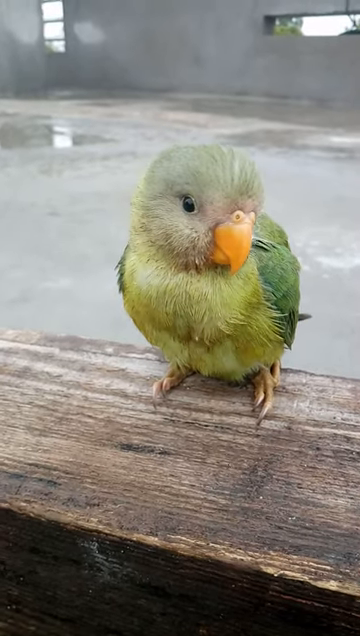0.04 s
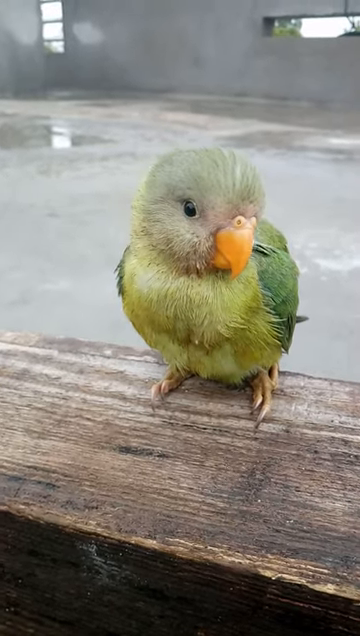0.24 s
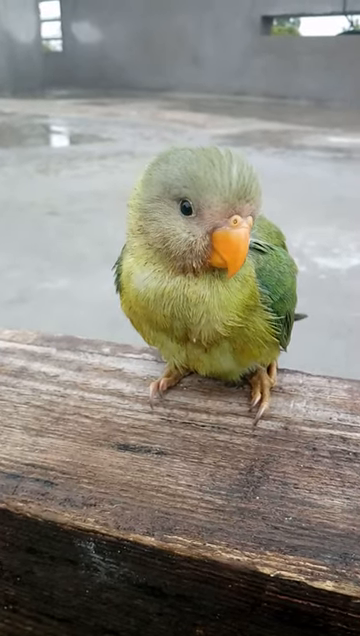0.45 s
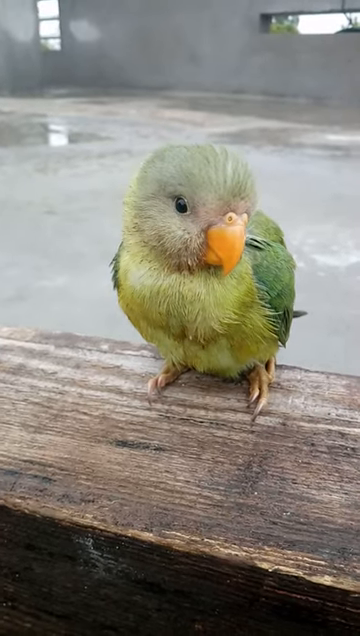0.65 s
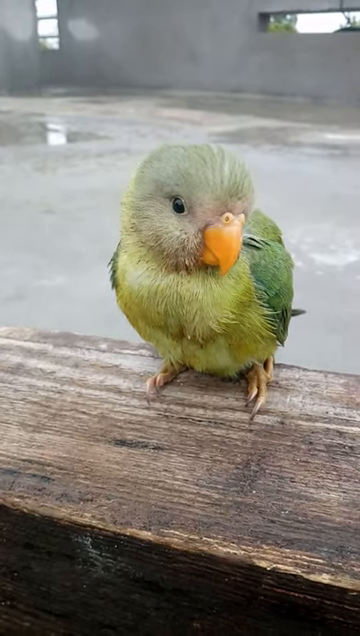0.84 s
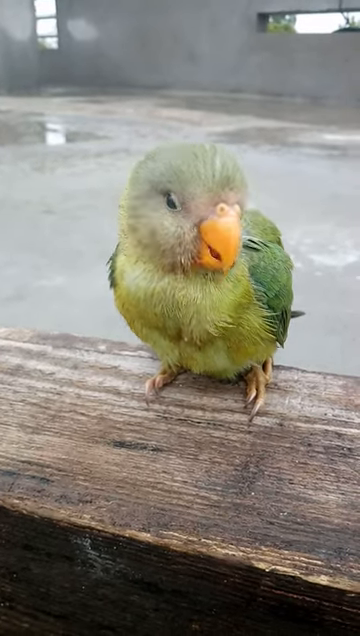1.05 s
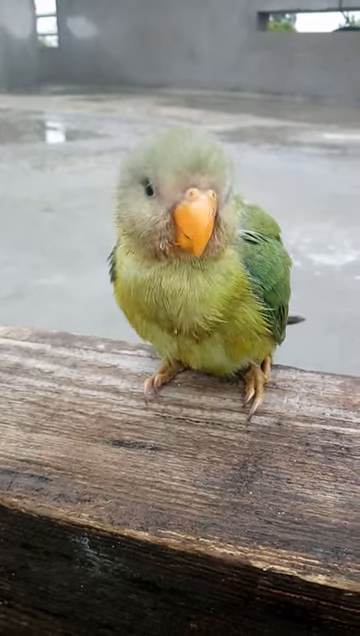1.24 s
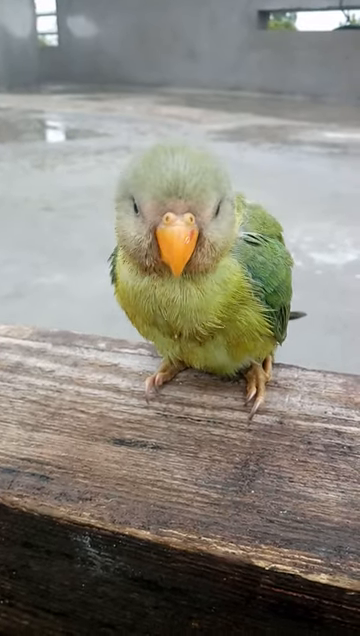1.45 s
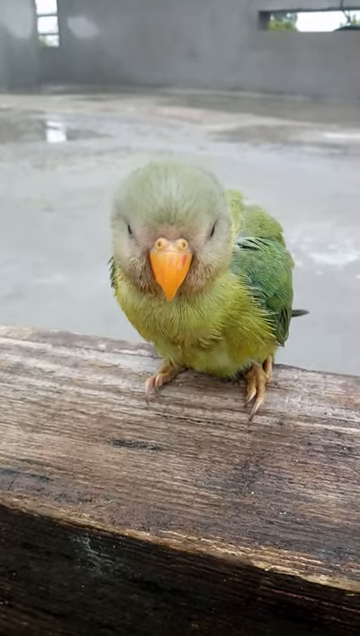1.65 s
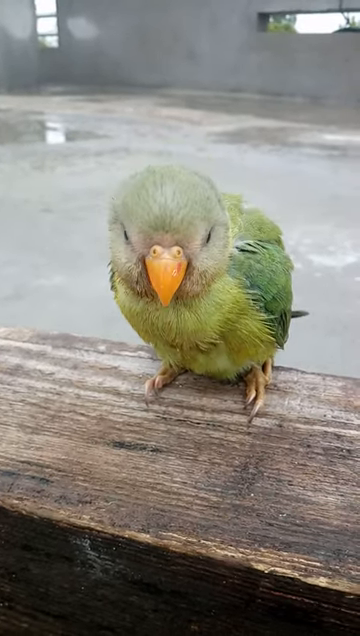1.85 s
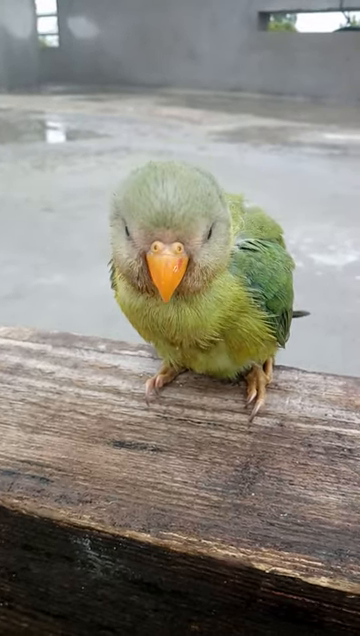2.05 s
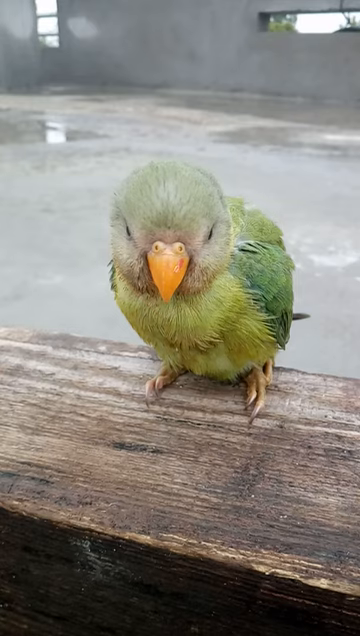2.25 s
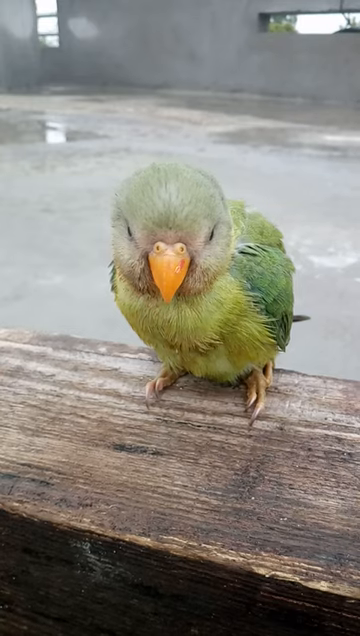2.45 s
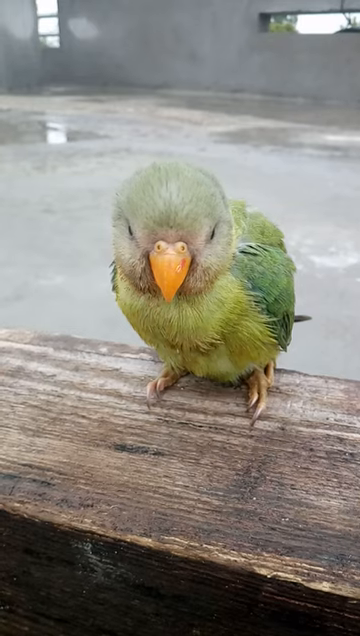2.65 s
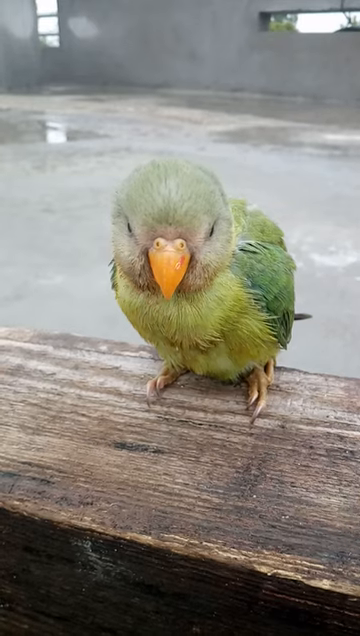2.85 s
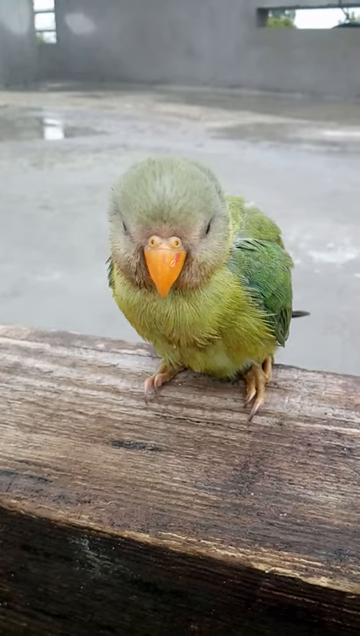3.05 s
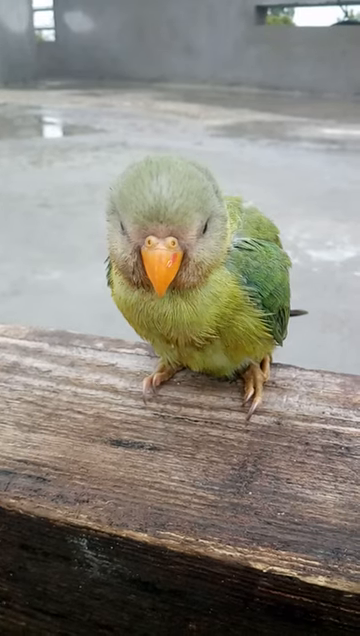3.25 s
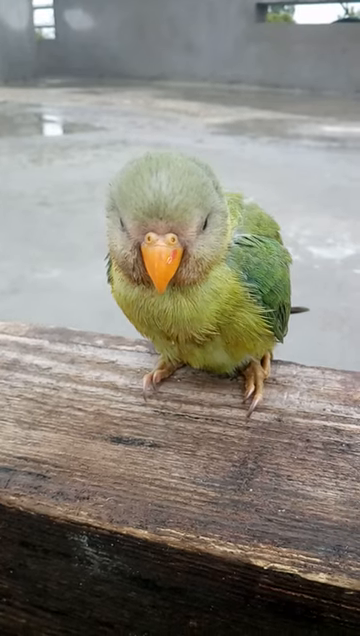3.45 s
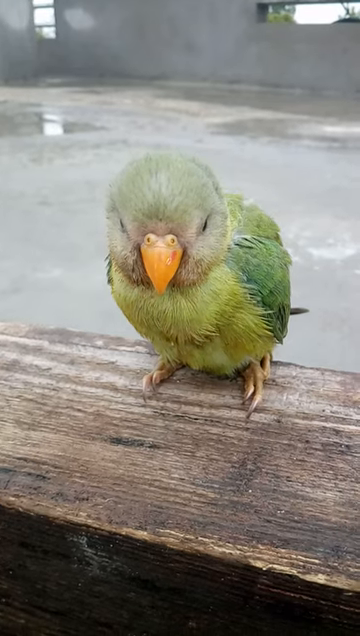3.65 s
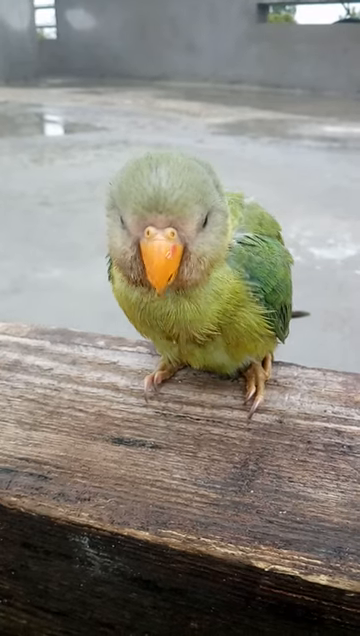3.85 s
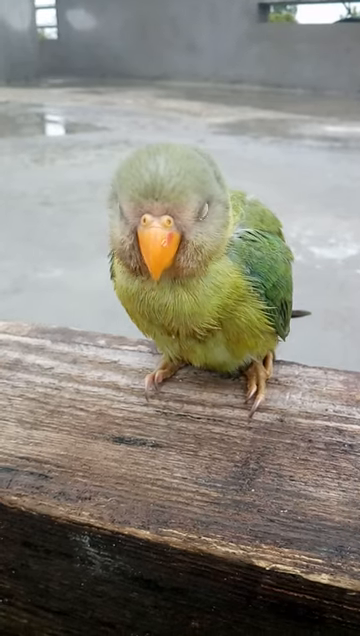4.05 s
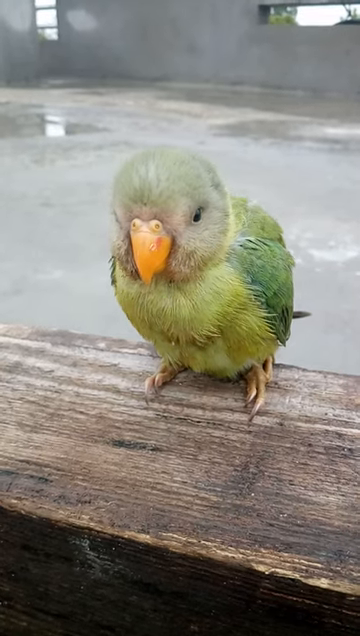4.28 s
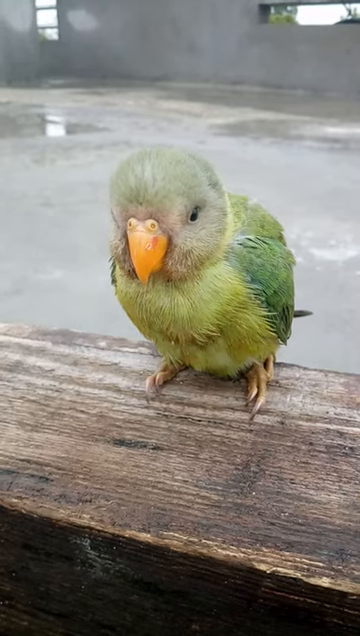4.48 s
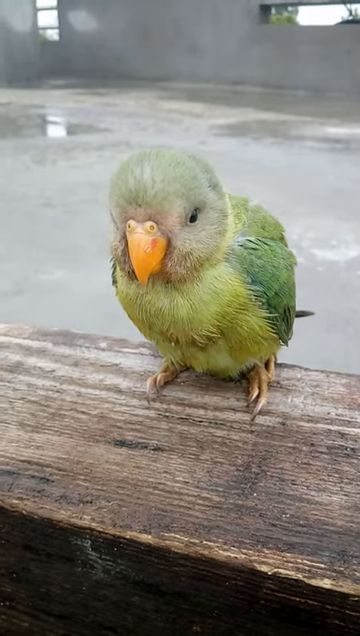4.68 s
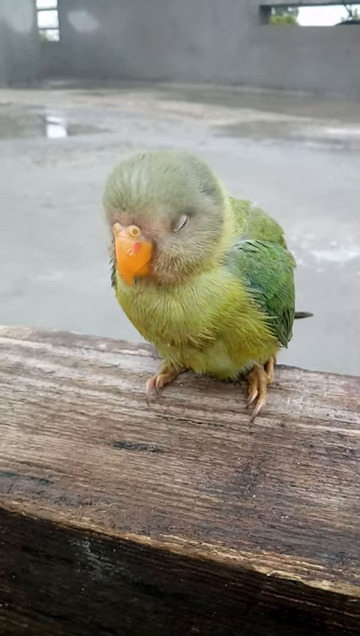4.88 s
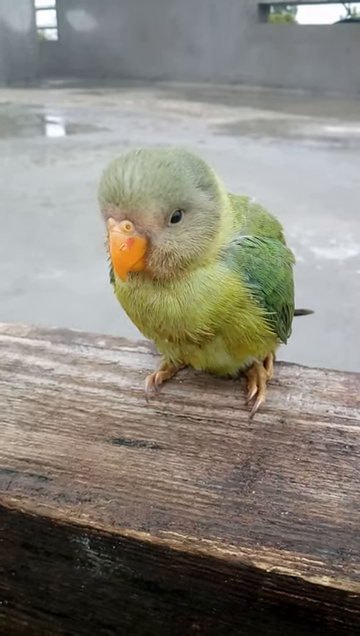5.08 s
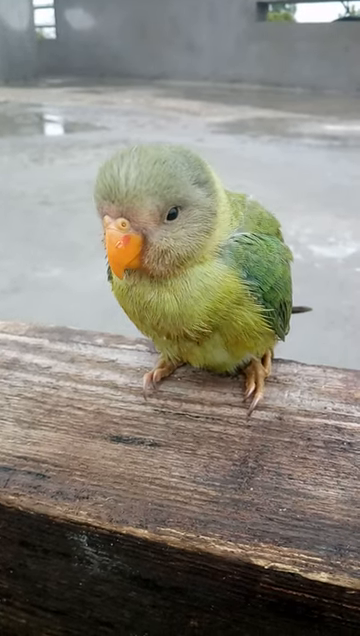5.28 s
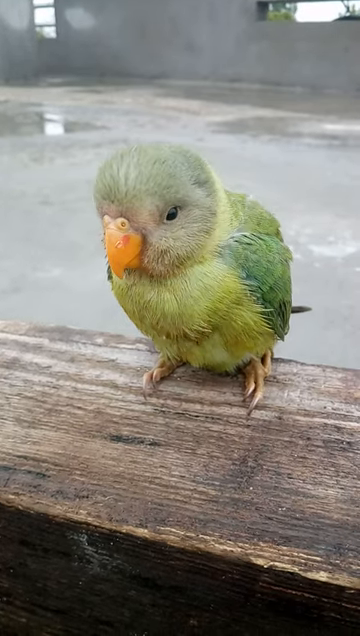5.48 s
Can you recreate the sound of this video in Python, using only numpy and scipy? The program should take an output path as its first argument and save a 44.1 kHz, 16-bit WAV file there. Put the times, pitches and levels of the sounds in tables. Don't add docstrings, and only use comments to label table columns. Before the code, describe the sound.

Close, bright parrot calls in stereo over airy hiss and low town hum. Early soft wind and finger thumps, a far crow and hen clucks; a loud rising squeak just after one second; a quieter gap with small echoing chirps and doves; then a rapid, even chatter of seven raspy falling notes with a second squeak among them, ending in distant tweets.

```python
import sys
import numpy as np
from scipy import signal
from scipy.fft import rfft, irfft
from scipy.io import wavfile
from scipy.ndimage import uniform_filter1d, minimum_filter1d

SR = 44100
rng = np.random.default_rng(int(sys.argv[2]) if len(sys.argv) > 2 else 0)


def int16_out(signal):
    q = np.round(np.clip(np.atleast_2d(signal).T, -1, 1) * 32767)
    wavfile.write(sys.argv[1], SR, q.astype(np.int16))


def field_ratio(decibels):
    return 10 ** (np.asarray(decibels, dtype=float) / 20)


N = 243431


def evened(x):
    return x / np.sqrt(np.mean(x ** 2) + 1e-20)


def read(points, hz, column=1):
    points = np.array(points, float)
    return np.interp(np.log(hz + 1), np.log(points[:, 0] + 1), points[:, column])


def add(mix, s, sound):
    part = mix[..., max(round(s * SR), 0):][..., :sound.shape[-1]]
    part += sound[..., :part.shape[-1]]


def wobble(count, span):
    smooth = uniform_filter1d(rng.standard_normal(count), int(span))
    return evened(uniform_filter1d(smooth, int(span)))


def hum():
    # frequency in Hz, level in dB per Hz.
    hum_colour = [(15, -43), (25, -11.5), (140, -0.5), (306, -4.5), (470, -9), (568, -6.5), (649, -10.5),
                  (1860, -19.5), (2360, -11), (3350, -9), (7130, -27), (8160, -32.5), (11300, -36),
                  (14400, -37), (15600, -48.5)]
    # frequency in Hz, correlation from -1 to 1.
    likeness = [(60, 0.99), (150, 0.99), (380, 0.51), (950, 0.5), (2380, -0.3), (5980, -0.05),
                (15000, 0.66)]
    # frequency in Hz, left minus right in dB.
    balance = [(60, 1.5), (150, -0.5), (380, 0), (950, -1.5), (2380, 8), (5980, 6), (15000, 1.5)]
    # start in seconds, bass in dB, treble in dB,
    # sinking time in seconds.
    surges = [
        (0, 6.5, 6.5, 0.21),
        (.41, -1, 5.5, 1.2),
        (1.0, 3.5, -2, 0.32),
        (1.77, 0, 6.5, 1.6),
        (3.101, 8.5, -1, 0.79),
        (5.29, 1.5, 7.5, .4),
    ]
    calm_bass_db, calm_treble_db = -5, -8
    frames, hz = N // 256 + 5, np.fft.rfftfreq(1024, 1 / SR)
    a, b, c, d, patches = rng.standard_normal((frames, 513, 5)).T
    patches = evened(uniform_filter1d(uniform_filter1d(patches, 8, 0), 12, 1))
    t = np.arange(frames) * 256 / SR
    high = 1 / (1 + (900 / (hz[:, None] + 1)) ** 2)
    low = 1 - high
    swell_db = low * calm_bass_db + high * calm_treble_db
    for s, bass_db, treble_db, sink_s in surges:
        sinking = (t >= s) * np.exp(-abs(t - s) / sink_s)
        swell_db = swell_db + (low * bass_db + high * treble_db) * sinking
    same = np.clip(read(likeness, hz), -1, 1)[:, None]
    left = a + 1j * b
    right = same * left + np.sqrt(1 - same ** 2) * (c + 1j * d)
    z = np.array([left, right])
    z *= field_ratio(np.array([.5, -.5])[:, None, None] * read(balance, hz)[:, None])
    z *= field_ratio(read(hum_colour, hz)[:, None] + 2.2 * patches + swell_db)
    noise = signal.istft(z, nperseg=1024, noverlap=768)[1][:, :N]
    low_cut = signal.butter(3, 42., "high", fs=SR, output="sos")
    return field_ratio(-66.5 + 2.0) * evened(signal.sosfilt(low_cut, noise))


def knocks():
    # centre in seconds, peak in dB, pitch in Hz, left minus right in dB.
    thumps = [(0.045, -45.5, 80.4, -4), (0.058, -46, 188, 10), (.118, -47.5, 115, 27.5), (.163, -46, 70, 5),
              (0.181, -43.5, 61, -5), (0.244, -48, 82.4, 14.5), (0.271, -48, 107, 30),
              (0.27, -59.5, 292, 18), (0.309, -49.5, 202, 8), (1.54, -62, 78.8, -18),
              (1.612, -57, 140, -15), (1.751, -58.5, 129, -23), (1.77, -60, 54.8, -19),
              (1.81, -63, 109.6, -19)]
    # start in seconds, peak in dB, pitch in Hz.
    ticks = [
        (.378, -66, 780),
        (.811, -56, 1400),
        (.845, -55, 1150),
        (.921, -62, 900),
        (.944, -62, 900),
        (1.166, -59, 890),
        (1.167, -58, 3980),
        (5.303, -63, 3265),
    ]
    out, t = np.zeros((2, N)), np.arange(-2000, 2000) / SR
    for s, db, hz, pan_db in thumps:
        phase = np.array([[0], [rng.uniform(-np.pi, np.pi)]])
        push = np.sin(2 * np.pi * hz * t + phase) * np.exp(-(t * hz / 0.93) ** 2)
        add(out, s + t[0], field_ratio(db) * field_ratio(np.array([[pan_db], [-pan_db]]) / 2) * push)
    t = t - t[0]
    for s, db, hz in ticks:
        ring = np.sin(2 * np.pi * hz * t) * t / 0.0006 * np.exp(1 - t / 0.0013)
        add(out, s, field_ratio(db) * ring * field_ratio(np.array([[2], [-2]])))
    return out


def whistle(hz, fuzz_hz):
    span = SR / fuzz_hz / 2
    drift = 0.74 + wobble(len(hz), span) + 1j * wobble(len(hz), span)
    return evened((drift * np.exp(2j * np.pi * np.cumsum(hz) / SR)).real)


def blurred(calls):
    out = np.zeros(N)
    for s, length, from_hz, to_hz, db, fuzz_hz in calls:
        hz = np.geomspace(from_hz, to_hz, round(length * SR))
        add(out, s, field_ratio(db) * whistle(hz, fuzz_hz) * signal.windows.tukey(len(hz), .4))
    return out


def walls(x, first_s, longer):
    # frequency in Hz, decay by 60 dB in seconds, level in dB.
    decay = [(600, 0.25, -9.5), (1157, 0.41, 4.5), (1800, 0.46, 2), (2900, 0.29, 2), (4192, 0.35, -4.5),
             (7260, 0.52, -12), (10000, 0.14, -5)]
    taps = np.zeros((2, SR))
    start = np.arange(int(first_s * SR), SR - 20, 20)
    at = start + rng.integers(0, 20, (2, SR))[:, :len(start)]
    signs = rng.choice([-1., 1.], (2, SR))[:, :len(start)]
    np.put_along_axis(taps, at, signs, 1)
    hz, t, z = signal.stft(taps, SR, nperseg=256)
    fade_db = read(decay, hz, column=2)[:, None] - 60 * t / (longer * read(decay, hz)[:, None])
    tail = signal.istft(z * field_ratio(fade_db), SR, nperseg=256)[1]
    return signal.fftconvolve(x[None], tail / np.linalg.norm(tail[0]), axes=1)[:, :N]


def rooster(out):
    # start in seconds, length in seconds, first, second and third harmonic in dB.
    syllables = [
        (0, 0.061, -80, -65, -60),
        (0.066, 0.17, -68.5, -72, -80),
        (0.206, 0.11, -48, -74.5, -85),
        (0.306, 0.12, -63.5, -85, -89),
        (0.391, 0.16, -66.5, -61.5, -66.5),
        (0.531, 0.13, -61.5, -70, -86),
        (0.727, 0.29, -72, -59, -63.5),
        (0.993, 0.11, -84.5, -59.5, -84),
    ]
    crow_hz, throb_hz, throb_depth = 719, 46, .35
    waver = wobble(SR + SR // 4, 1100)
    crow = np.array([whistle(k * crow_hz * (1 + .007 * waver), 13 * k) for k in range(1, 4)])
    crow *= 1 + throb_depth * np.cos(2 * np.pi * np.cumsum(throb_hz * (1 + 0.7 * waver)) / SR)
    for s, length, *levels_db in syllables:
        u = np.linspace(0, 1, round(length * SR))
        shape = field_ratio(-7 * u ** 2) * signal.windows.tukey(len(u), .5)
        sung = crow[:, round(max(s, 0) * SR):][:, :len(u)]
        add(out, s, shape * (field_ratio(np.array(levels_db)) @ sung))


def far_birds():
    # start and length in seconds, pitch in Hz, level in dB.
    coos = [(0, 0.14, 1254, -69.5), (.41, 0.12, 812, -66.5), (1.62, .08, 801, -77), (1.932, .11, 243, -70),
            (2.43, 0.26, 495.7, -59.5), (2.836, 0.2, 420.5, -66.5), (2.916, .15, 504, -61),
            (3.119, .2, 255.2, -70), (3.164, 0.073, 1262, -75.5), (3.15, 0.1064, 840, -77),
            (3.303, 0.26, 406, -75.5), (3.351, 0.25, 247, -67), (3.5, 0.17, 583, -56.5),
            (3.825, 0.13, 918, -54.5), (4.028, 0.062, 1055, -55), (4.128, 0.32, 529, -64.5),
            (4.26, .032, 1080, -55.5), (4.461, 0.26, 1150, -51.5), (4.551, .22, 554, -73),
            (4.884, 0.24, 1117, -74.5), (5.07, .2, 767, -70), (5.15, 0.15, 884, -69.5),
            (5.266, .16, 962, -74), (5.0, .12, 940, -78), (5.392, 0.0454, 221, -66)]
    # start and length in seconds, from Hz, to Hz, level in dB.
    cackle = [
        (.682, 0.089, 1434, 1417, -53.5),
        (.803, 0.045, 1473, 1403, -45.5),
        (.846, 0.13, 1442, 1238, -47.5),
        (.872, 0.1, 1332, 988, -53),
        (.952, 0.082, 1392, 1300, -69),
    ]
    # start and length in seconds, from Hz, to Hz, level in dB.
    tweets = [(5.13, .035, 3350, 3040, -69.5), (5.204, 0.078, 3640, 3770, -72),
              (5.254, 0.034, 3730, 3380, -66.5), (5.297, 0.029, 3480, 3250, -61.5),
              (5.311, 0.1, 3480, 4070, -64), (5.337, .06, 3140, 3560, -70),
              (5.299, 0.026, 1690, 2900, -69.5), (5.352, 0.0264, 2610, 2960, -69),
              (5.407, .022, 2760, 2690, -70), (5.399, .12, 4050, 3980, -71), (5.419, .016, 2100, 1920, -81),
              (5.426, .018, 3320, 3200, -69), (5.445, 0.023, 2760, 2740, -66),
              (5.47, 0.0184, 3350, 3220, -70)]
    # start and length in seconds, from Hz, to Hz, level in dB, fuzz in Hz.
    swoop = (.555, .12, 5150, 2700, -74, 60)
    calls = [(s, length, hz, hz, db, 12 + .035 * hz) for s, length, hz, db in coos]
    calls += [(*row, 22 * 1.7 ** k) for k, row in enumerate(cackle)]
    calls += [(*row, 333.6) for row in tweets]
    out = blurred(calls + [swoop])
    rooster(out)
    echo = field_ratio(-7) * walls(out, first_s=.01, longer=1.3)
    return field_ratio(np.array([[1.5], [-2.5]])) * (field_ratio(3.0) * out + echo)


def hidden_bird():
    # start in seconds, level in dB.
    chirps = [(0.164, -73), (.39, -69.5), (.615, -72), (.85, -71.5), (1.08, -71), (1.515, -73),
              (1.75, -64.5), (1.985, -65), (2.24, -68.5), (2.46, -66.5), (2.69, -65.5), (2.93, -88),
              (3.3, -84)]
    # delay and length in seconds, from Hz, to Hz, level in dB.
    strokes = [
        (0, .06, 3620, 3200, 0),
        (.035, .06, 3600, 2950, 0),
        (.05, .07, 4500, 4000, -9),
        (.02, .1, 2420, 2260, -10),
        (.09, .07, 4600, 3950, -10),
    ]
    out = blurred([(s + delay, length, from_hz, to_hz, db + own_db, 260)
                   for s, db in chirps for delay, length, from_hz, to_hz, own_db in strokes])
    near = field_ratio(-3) * out
    return field_ratio(np.array([[3], [-3]])) * (near + walls(out, first_s=0.0079, longer=0.98))


def syrinx(rows, orders_db, thin_db, smooth_s, jitter, breath_db, tight_floor):
    s, hz, effort_db = np.transpose(rows)
    t = np.arange(s[0], s[-1], 1 / SR)
    hz, effort_db = (uniform_filter1d(np.interp(t, s, curve), int(smooth_s * SR), mode="nearest")
                     for curve in (hz, effort_db))
    slack = np.clip(1000 / hz, 0, 2) ** 2
    turns = np.cumsum(hz * (1 + jitter * slack * wobble(len(t), 30))) / SR
    snap = uniform_filter1d(np.clip(np.gradient(hz) * SR / 70000., 0, 1), size=88)
    thin_db = thin_db * np.clip((2300 - hz) / 200, 0, 1)
    flute_db = -30 * np.clip((np.maximum(hz, np.roll(hz, -50)) - 3300) / 200, 0, 1)
    tight_db = -20 * np.clip((hz - 2280) / 200, 0, 1) * np.clip((2700 - hz) / 100, tight_floor, 1)
    tone = 0
    for k, db in enumerate(orders_db, 1):
        level_db = db + (thin_db if k == 1 else flute_db)
        level_db = level_db - 14 * np.clip((k * hz - 11800) / 500, 0, 1)
        level_db = level_db + max(k - 2, 0) * (tight_db - 3.5 * snap)
        level_db = level_db + 0.55 * k * wobble(len(t), 210)
        tone = tone + field_ratio(level_db) * np.cos(2 * np.pi * k * turns) * (k * hz < SR / 2.5)
    breath = field_ratio(breath_db + flute_db / 5 + 4 * snap) * (1.6 + 4.0 * slack)
    puffs = breath * (1 + np.cos(2 * np.pi * turns)) * rng.standard_normal(len(t))
    effort = np.sqrt(2) * field_ratio(effort_db + .8 * wobble(len(t), 290))
    return s[0], effort * (tone + puffs) * signal.windows.tukey(len(t), .02)


def path(voice, colour, nulls, lead):
    hz = np.fft.rfftfreq(len(voice), 1 / SR)
    db = []
    for port in (1, 2):
        bounces_db = sum(row[port + 1] / (1 + (2 * (hz - row[0]) / row[1]) ** 2) for row in nulls)
        db.append(read(colour, hz, column=port) + bounces_db)
    db = np.array(db)
    mirrored = np.r_[db[0], db[0, -2:0:-1]]
    phase = -signal.hilbert(np.log(field_ratio(mirrored))).imag[:len(hz)]
    lead_hz, lead_rad = np.transpose(lead)
    lag = np.interp(hz, lead_hz, np.unwrap(lead_rad))
    return irfft(rfft(voice) * field_ratio(db) * np.exp(1j * np.array([phase, phase - lag])), len(voice))


def parrot(notes, orders_db, colour, nulls, lead, thin_db, **voice):
    dry = np.zeros(2 ** 18)
    for rows, note_thin_db in zip(notes, thin_db):
        add(dry, *syrinx(rows, orders_db, note_thin_db, **voice))
    return path(dry, colour, nulls, lead)[:, :N]


def squeak_notes():
    # start in seconds, rise and whistle lengths in seconds, last pitch of the rise in Hz,
    # rise effort in dB.
    squeaks = [
        (1.182, .1285, .0285, 3109, 8),
        (3.971, .133, .0195, 3300, 3.5),
    ]
    # seconds after the start, pitch in Hz, effort in dB.
    grunt = [
        (0, 652, -19.5),
        (.006, 622, -7),
        (0.0109, 850, -12),
        (0.0101, 1433, -13),
    ]
    # share of the rise, pitch in Hz, effort in dB.
    climbing = [(.14, 1652, -6), (.205, 1800, -1.5), (.41, 1883, -3), (.57, 2138, -6.5), (.72, 2532, -5.5),
                (.855, 2914, -3)]
    # share of the whistle, pitch in Hz, effort in dB.
    fluting = [(.03, 3776, -2), (.15, 3960, 0.5), (.4, 4100, 1.5), (.75, 4290, -0.5), (.87, 4070, 2),
               (1, 3450, -13.5)]
    # seconds after the whistle, pitch in Hz, effort in dB.
    flick = [
        (.0006, 5070, -6),
        (.003, 3930, -5),
        (.006, 3000, -15.5),
    ]
    notes = []
    for start, rise, flute, last_hz, rise_db in squeaks:
        flute_db = 0.31 * rise_db
        top = start + rise
        rows = [(start + s, hz, db + rise_db) for s, hz, db in grunt]
        rows += [(start + share * rise, hz, db + rise_db) for share, hz, db in climbing]
        rows += [(top, last_hz, rise_db - 9.5)]
        rows += [(top + share * flute, hz, db + flute_db) for share, hz, db in fluting]
        rows += [(top + flute + s, hz, db + flute_db) for s, hz, db in flick]
        notes.append(rows)
    return notes


def squeaker():
    orders_db = [4, 1.34, -1, -13.5, -9, -10.5, -20.5, -19.5]
    # frequency in Hz, left in dB, right in dB.
    colour = [(399.4, -47.5, -52), (700, -33.5, -45.5), (1679, -30, -36.5), (2300, -23, -28.5),
              (2610, -17, -22.5), (3420, -13.5, -24), (4100, -19, -16.5), (4980, -17, -17),
              (6130, -32, -23), (7080, -12, -28), (7780, -25.5, -30), (8900, -56, -54), (10500, -24, -46.5),
              (15500, -53.5, -62.5)]
    # frequency in Hz, width in Hz, left in dB, right in dB.
    nulls = [(2034, 490, -10, 2), (3343, 43, -7, -17.5), (4380, 200, -3.5, -6), (5830, 210, -2, 9.5),
             (5900, 1100, 8, -26.5), (6030, 200, -10, -7.5), (8950, 700, -30, -25.5),
             (14000, 1300, -44.5, -41.5)]
    # frequency in Hz, lead in radians.
    lead = [(1000, -3.1), (2300, -2.5), (3100, -3.8), (3700, -6.3), (4200, -6.6), (4700, -8), (5200, -10),
            (7300, -12.6)]
    thin_db = [1, -3.5]
    return parrot(squeak_notes(), orders_db, colour, nulls, lead, thin_db,
                  smooth_s=0.00053, jitter=0.01174, breath_db=-29.5, tight_floor=0.28)


def chatter_notes():
    # seconds after its start, pitch in Hz, effort in dB.
    opening = [(0, 697, -9.5), (.005, 880.6, -14.5), (.009, 1094, -3), (0.02, 2188, -3), (0.03, 2526, 0),
               (0.068, 1875, 0.5), (.095, 1620, -2), (.122, 1270, 3), (.129, 1138, -12.5)]
    # start, length and climb in seconds, bump as a share of the note, bump in Hz.
    timing = [(3.698, 0.13, .0235, .52, 1716), (3.909, 0.13, 0.025, .495, 1797),
              (4.118, 0.13, .027, .49, 1875), (4.325, 0.13, .028, .525, 1913),
              (4.536, 0.124, .027, .53, 1861), (4.747, 0.13, .027, .505, 1910)]
    # peak in Hz, dip in Hz, mid-slide pitch in Hz, effort in dB.
    sung = [(2487, 1740, 1560, 0), (2520, 1710, 1570, 0.5), (2450, 1730, 1530, 0.5),
            (2630, 1710, 1500, 1.5), (2500, 1720, 1545, 0.5), (2675, 1745, 1510, 1)]
    # share of the climb, pitch in Hz, effort in dB.
    climbing = [(0, 620, -10.5), (0.387, 1071, -5), (.62, 1600, -0.5), (0.8, 2353, 2.5)]
    # seconds after the peak, share of the way to the dip, effort in dB.
    drop = [(0, 0, 1), (.004, 0.052, 5), (.009, .62, 1), (.014, .88, 2), (0.023, 1, 0.5)]
    # seconds from its tip, share of its height, effort in dB.
    tent = [
        (-.011, .2, 3.5),
        (0, 1, 5.5),
    ]
    # share of the note, pitch in Hz, effort in dB.
    closing = [
        (0.897, 1296, 0),
        (.95, 1154, -4.5),
        (.98, 1037, -35.5),
    ]
    slide_db = 2.5
    notes = [[(3.486 + s, hz, db) for s, hz, db in opening]]
    for (start, length, climb, bump, bump_hz), (peak_hz, dip_hz, slide_hz, own_db) in zip(timing, sung):
        tip = bump * length
        rows = [(share * climb, hz, db) for share, hz, db in climbing]
        rows += [(climb + s, peak_hz + share * (dip_hz - peak_hz), db) for s, share, db in drop]
        rows += [(tip + s, dip_hz + share * (bump_hz - dip_hz), db) for s, share, db in tent]
        rows += [(tip + 0.015, bump_hz + 0.62 * (slide_hz - bump_hz), slide_db - 2)]
        rows += [(0.75 * length, slide_hz, slide_db)]
        rows += [(share * length, hz, db) for share, hz, db in closing]
        notes.append([(start + s, hz, db + own_db) for s, hz, db in sorted(rows)])
    return notes


def chatterer():
    orders_db = [-3, 0, -4, -7, -12, -15, -22, -27, -31, -34]
    # frequency in Hz, left in dB, right in dB.
    colour = [(343, -39, -37.5), (607, -19, -19), (1530, -24.5, -35), (2357, -17, -17.5), (2830, -15, -16),
              (3820, -13.5, -33), (4800, -6, -17.5), (6014, -4, -22.5), (6974, -15.5, -29),
              (8090, -28, -67.5), (8750, -29, -31), (9970, -21, -63.5), (10120, -26.5, -65.5),
              (16070, -41.5, -52)]
    # frequency in Hz, width in Hz, left in dB, right in dB.
    nulls = [(1336, 380, -0.5, 1.5), (1710, 170, -5, 7), (2047, 110, 3.5, -3), (2406, 200, -8, -5.5),
             (2820, 77, -12, -10), (3562, 100, 0, -14.5), (4304, 158, -31, 7.5), (5247, 797, -20, -27.5),
             (6493, 81, -11, -16.5), (8010, 730, -1.5, -17.5), (8840, 266, -20.5, 2),
             (12250, 350, -22.5, -20), (14570, 700, -12.5, -14), (15200, 600, 12, 10)]
    # frequency in Hz, lead in radians.
    lead = [(500, -.8), (1100, -1), (1600, -1.5), (2600, -1.4), (3100, -2.6), (4100, -1.9), (5000, -.6),
            (5700, 1.9), (7300, 2.1), (9000, 3.2)]
    notes = chatter_notes()
    return parrot(notes, orders_db, colour, nulls, lead, np.zeros(len(notes)),
                  smooth_s=0.0028, jitter=0.031, breath_db=-37.5, tight_floor=.9)


def slaps(x):
    # delay in seconds, level in dB.
    bounces = [
        (0.019, -23),
        (0.025, -29.5),
        (0.049, -32),
        (.0555, -32.5),
        (.075, -30),
    ]
    x = signal.sosfilt(signal.butter(2, 4200., fs=SR, output="sos"), x)
    out = np.zeros((2, N))
    for s, db in bounces:
        add(out[0], s, field_ratio(db) * x)
        add(out[1], s + 0.00023, field_ratio(db - 8.5) * x)
    return out


def scene():
    squeaks, chatter = squeaker(), chatterer()
    to_walls = field_ratio(-3.5) * chatter[0] + field_ratio(-1) * chatter[1] + field_ratio(-13) * squeaks[0]
    echoes = field_ratio(np.array([[-21], [-24]])) * walls(to_walls, first_s=0.0042, longer=1.0)
    repeats = slaps(chatter[0] + field_ratio(-12) * squeaks[0])
    background = hum() + knocks() + far_birds() + hidden_bird()
    return background + squeaks + chatter + repeats + echoes


def top_cut(x):
    return signal.sosfilt(signal.butter(12, 15450, fs=SR, output="sos"), x)


def record(dry):
    peak = -minimum_filter1d(-abs(dry).max(0), size=301)
    over = uniform_filter1d(np.maximum(peak / .82, 1), size=301)
    return top_cut(dry / over)


dry = scene()
out = record(dry)
int16_out(out)
```